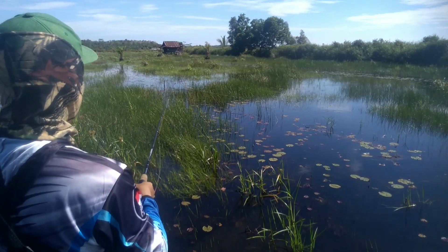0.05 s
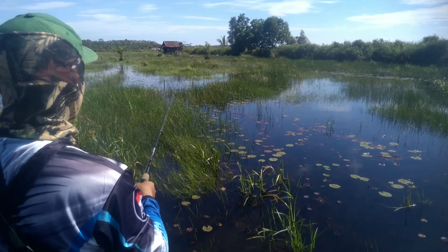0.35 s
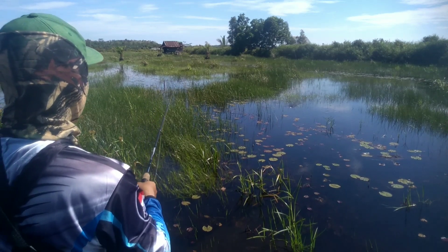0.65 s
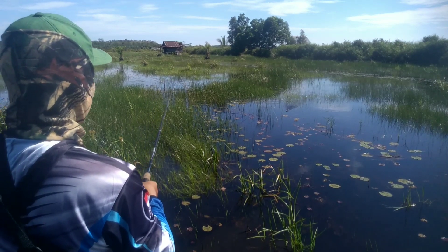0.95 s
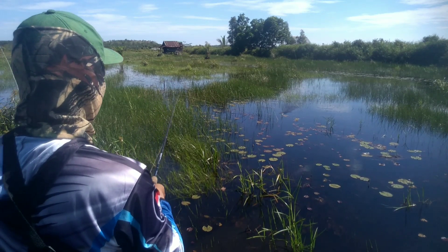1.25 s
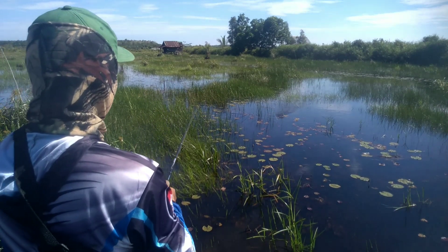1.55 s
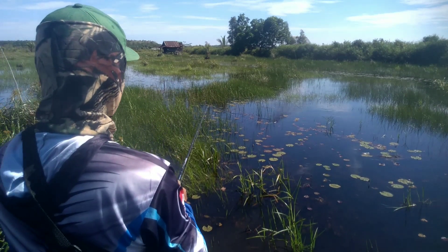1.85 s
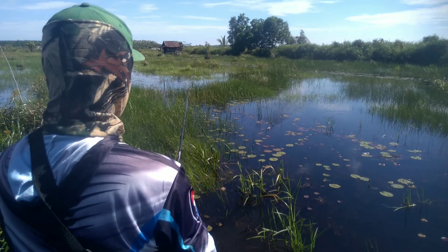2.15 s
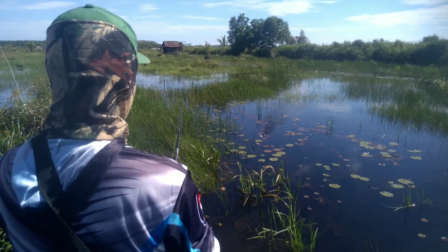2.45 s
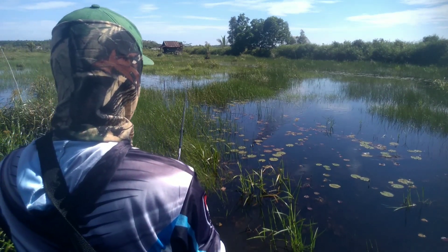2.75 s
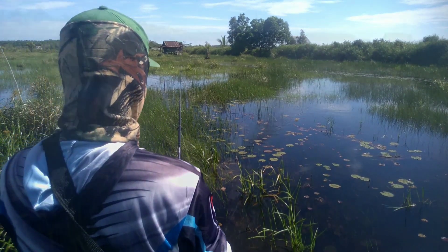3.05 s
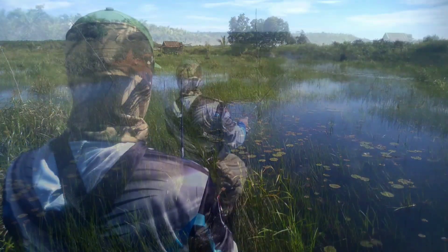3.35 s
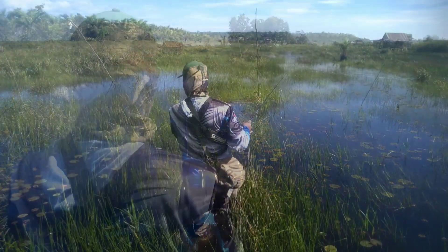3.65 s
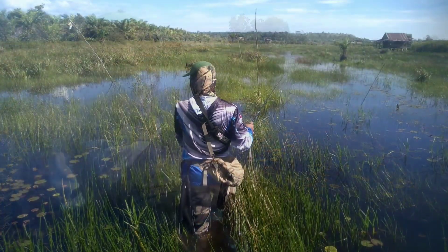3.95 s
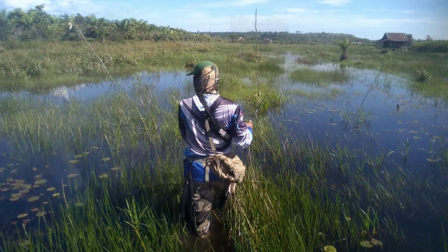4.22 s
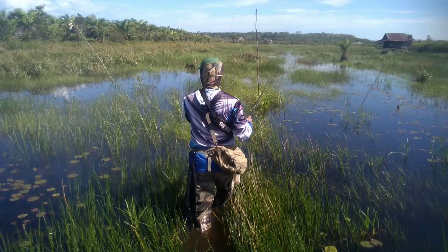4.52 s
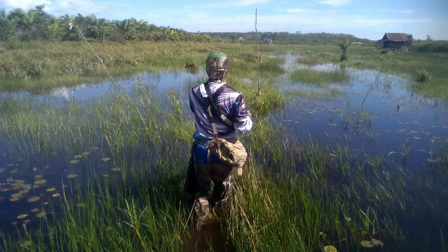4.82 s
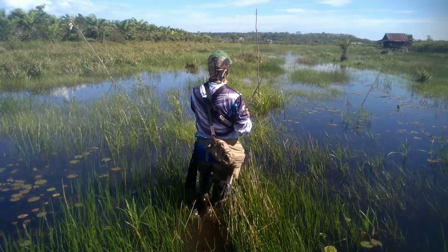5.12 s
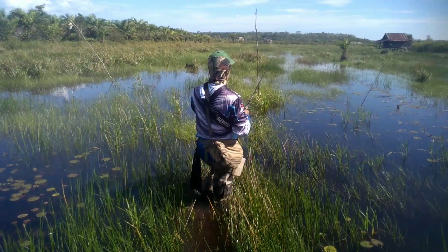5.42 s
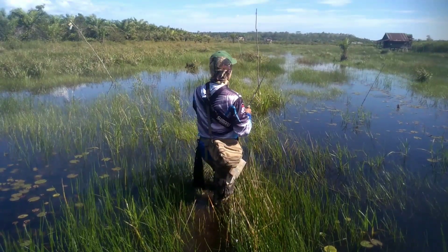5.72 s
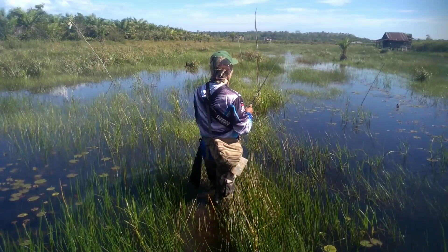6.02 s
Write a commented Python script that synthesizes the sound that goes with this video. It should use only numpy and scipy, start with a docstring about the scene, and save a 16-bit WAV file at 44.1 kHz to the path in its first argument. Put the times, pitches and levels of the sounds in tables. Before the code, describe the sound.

Two slow wading strides slosh through shallow, grassy swamp water close to a small outdoor microphone, the second louder and splashier, each followed by muddy gurgles. Before them the marsh is quiet, with faint trilling insects, far birds, lone plops and a couple of dull gear bumps. Low wind buffets the microphone and grows near the end. The brighter sounds sit to the right.

```python
"""A grassy swamp: wind buffets a small camera's two ports over a faint hush, insects trill, far birds call.
Lone bubbles plop, grass brushes past and gear bumps softly. At about 3 s and 5 s someone wades a slow
stride, the second louder: each leg folds air into the water, which rings as gulps, bubbles and fizz,
and drags spray through the reeds. Mud gurgles under the boots, and the wind builds towards the end.
The left port is muffled, so the bright sounds of the marsh sit to the right."""
import sys
import numpy as np
from scipy import signal
from scipy.fft import rfft, irfft
from scipy.io import wavfile
from scipy.ndimage import uniform_filter1d

SR = 44100
rng = np.random.default_rng(int(sys.argv[2]) if len(sys.argv) > 2 else 0)


def bounce(signal):
    """Save signal as a 16-bit WAV file at the path given by the first command-line argument."""
    frames = np.transpose(np.atleast_2d(signal))
    limited = np.clip(frames, -1, 1)
    pcm = np.round(limited * 32767).astype(np.int16)
    wavfile.write(sys.argv[1], SR, pcm)


N = 272538
TIME, BINS = np.arange(N) / SR, np.fft.rfftfreq(N, 1 / SR)
TRILLER_HZ, CHIRPER_HZ = 9705, 7905  # the two main near insects


def gain_of(db):
    """Decibels to amplitude."""
    return 10 ** (np.asarray(db) / 20)


def unit_rms(x):
    """Scales to rms 1."""
    return x / np.sqrt(np.mean(x ** 2) + 1e-20)


def steadied(x, span_s):
    """Rides the level to about rms 1 over span_s, keeping the faster grain."""
    size = max(int(span_s * SR), 8)
    power = np.mean(np.atleast_2d(x) ** 2, axis=0)
    return x / np.sqrt(abs(uniform_filter1d(uniform_filter1d(power, size), size)) + 1e-20)


def on_bins(points):
    """Spreads (freq_hz, value) rows over the frequency bins."""
    hz, value = np.transpose(points)
    return np.interp(np.log(BINS + 1), np.log(hz + 1), value)


def coloured(x, points):
    """EQ from (freq_hz, gain_db) rows, falling steeply above the last."""
    octaves_above = np.log2(np.maximum(BINS / points[-1][0], 1))
    return irfft(rfft(x) * gain_of(on_bins(points) - 20 * octaves_above), N)


def fader(rows):
    """Gain over time from (time_s, level_db) rows."""
    return gain_of(np.interp(TIME, *np.transpose(rows)))


def held(start, length, rise_s, fall_s):
    """An envelope that rises, holds until start + length, and dies away."""
    attack = np.clip((TIME - start) / rise_s, 0, 1) ** 2
    return attack * np.exp(-np.maximum(TIME - start - length, 0) / fall_s)


def crest(s, rise_s, fall_s, hold_s=0):
    """An envelope that swells up to time s, holds, and dies away."""
    return np.exp(-np.maximum(s - TIME, 0) / rise_s - np.maximum(TIME - s - hold_s, 0) / fall_s)


def add(mix, s, sound):
    """Mixes a sound in at time s."""
    part = mix[max(round(s * SR), 0):][:len(sound)]
    part += sound[:len(part)]


def narrow(hz, width_hz):
    """Noise in one resonance; at 0 Hz, a random drift."""
    return unit_rms(irfft(rfft(rng.standard_normal(N)) / (1 + ((BINS - hz) / width_hz) ** 2), N))


def bubble(hz, t60, glide, swell_cycles):
    """A pocket of air rings, its pitch gliding up as it nears the surface."""
    t = np.arange(int(1.2 * t60 * SR) + 16) / SR
    shape = (1 - np.exp(-(t * hz / swell_cycles) ** 2)) * np.exp(-np.log(1000) * t / t60)
    return shape / shape.max() * np.sin(2 * np.pi * hz * t * (1 + glide * t / t60))


def cloud(low_hz, high_hz, per_s, cycles, spread_db, glide, count=40):
    """Bubbles of many sizes, each size ringing at its own random moments."""
    chance, strength, kind = rng.random(N), rng.exponential(1, N), rng.integers(0, count, N)
    rings = [bubble(hz, cycles * rng.uniform(0.26, 1.84) / hz, glide, swell_cycles=1.5)
             for hz in np.geomspace(low_hz, high_hz, count)]
    out = np.zeros(N)
    for at in np.flatnonzero(chance < per_s / SR):
        gain = gain_of(spread_db * min(strength[at], 4))
        add(out, at / SR, gain * rng.choice([-1, 1]) * rings[kind[at]])
    return out


def ports(x, lag_ms, wet_db, t60, likeness):
    """Stereo with diffuse echoes off water and reeds; the left port lags below its resonance."""
    t = np.arange(SR // 2) / SR
    tail = rng.standard_normal((2, len(t))) * np.exp(-np.log(1000) * t / t60) * (1 - np.exp(-t / 0.0036))
    tail /= np.linalg.norm(tail[0])
    echo, left_echo = gain_of(wet_db) * signal.fftconvolve(x[None], tail, axes=1)[:, :N]
    left = x + likeness * echo + np.sqrt(1 - likeness ** 2) * left_echo
    delay_ms = lag_ms / (1 + (BINS / 1900) ** 4)
    return np.array([irfft(rfft(left) * np.exp(-2j * np.pi * BINS * delay_ms / 1000), N), x + echo])


def wind():
    """Eddies press on each port; only the slowest are shared."""
    # strength of the breeze: time_s, level_db
    breeze = [(0.0, -54), (0.3, -62.5), (0.45, -53), (0.75, -67), (3.05, -66), (3.45, -53), (3.9, -47.5),
              (4.45, -48.5), (4.7, -61.5), (4.95, -46), (5.85, -40.5), (6.1, -36)]
    # EQ of the low buffeting and of the flutter above it: freq_hz, gain_db
    buffet_eq = [(10, -19.5), (40, -4), (97, 5), (145, -1), (185, -11), (280, -32.5)]
    flutter_eq = [(120, -3.5), (210, 7.5), (330, 1.5), (480, -23.5)]
    # how alike the two ports are: freq_hz, likeness (0-1)
    port_likeness = [(35, 0.95), (90, 0.32), (400, 0.051)]
    left, other = rng.standard_normal((2, N))
    likeness = on_bins(port_likeness)
    right = irfft(likeness * rfft(left) + np.sqrt(1 - likeness ** 2) * rfft(other), N)
    eddies = np.array([left, right])
    buffet = steadied(coloured(eddies, buffet_eq), 0.42)
    flutter_fade_in = fader([(2.5, -33), (3.37, -8.5)])  # the flutter fades in at about 3 s
    flutter = steadied(coloured(eddies, flutter_eq), 0.8) * flutter_fade_in
    lean_db = np.interp(TIME, [.4, 1.1, 2.6, 3.2], [0.0, 6.0, 5.0, -1.5])  # swings left, then back
    return (gain_of(1.44) * buffet + flutter) * fader(breeze) * gain_of([lean_db, -lean_db])


def air():
    """Faint even hush of the open marsh."""
    # EQ of the hush: freq_hz, gain_db
    hush_eq = [(100, 16.5), (600, 2.5), (3000, -6), (9800, -7.5), (15500, -16)]
    hush = unit_rms(coloured(rng.standard_normal((2, N)), hush_eq))
    return hush * fader([(3, -74.5), (6.18, -77.5)]) * gain_of([[-1.5], [1.5]])


def insects():
    """A far chorus, and near stridulators whose thin tones pulse with each wing stroke."""
    # bouts of the near insects: start_s, length_s, pitch_hz, pulse_depth (0-1), level_db
    trills = [(0.444, 0.56, CHIRPER_HZ, 0.5, -77.5), (0.957, 0.61, TRILLER_HZ, 0.36, -71.5),
              (1.714, 1.55, TRILLER_HZ, 0.1, -75.5), (2.446, 0.33, CHIRPER_HZ, 0.55, -74),
              (3.303, 0.65, TRILLER_HZ, 0.5, -81), (3.974, 0.56, 6520, 0.3, -92.5),
              (5.65, 1.23, CHIRPER_HZ, 0.5, -86)]
    # fade of the far chorus: time_s, level_db
    chorus_fade = [(3, -76), (4.0, -83.5)]
    strokes_per_s = 22 * (1 + 0.28 * narrow(0, 8))
    strokes = np.cumsum(strokes_per_s) / SR
    rasp = 1 + 0.6 * narrow(0, 240)
    pulse = unit_rms(np.exp(-(np.sin(np.pi * strokes) / 0.4) ** 2))
    wander_hz = 45.1 * narrow(0, 30)
    falter = gain_of(4 * narrow(0, 1.8))
    near = np.zeros(N)
    for start, length, hz, depth, db in trills:
        tone = unit_rms(np.sin(2 * np.pi * np.cumsum(hz + wander_hz) / SR) * (1 - depth + depth * pulse))
        near += gain_of(db) * tone * held(start, length, rise_s=0.076, fall_s=0.1)
    bursts = unit_rms(np.sqrt(pulse * np.maximum(narrow(0, 5.6), 0)))  # far ones chirp on and off
    far = narrow(7370, 290)
    far += bursts * (gain_of(-8.5) * narrow(7920, 60) + gain_of(-5) * narrow(8780, 110))
    return np.tile(near * falter * rasp + gain_of(-4) * far * fader(chorus_fade), (2, 1))


def birds_and_drips():
    """Distant bird notes, hoarse when loud, plus two short drip-like clicks, all blurred by echoes."""
    # bird notes, and the clicks at 1.864 s and 2.268 s: start_s, length_s, first_hz, last_hz, level_db
    glides = [(0.115, 0.043, 1970, 2130, -65), (0.162, 0.046, 2363, 2055, -66.5),
              (0.201, 0.051, 1920, 1763, -68), (0.26, 0.066, 2253, 1980, -66.5),
              (0.432, 0.08, 1735, 1834, -68), (0.467, 0.24, 2057, 2088, -74),
              (0.809, 0.068, 2000, 1786, -68.5), (0.872, 0.034, 2133, 2275, -66),
              (1.08, 0.416, 2182, 2238, -76), (1.119, 0.066, 1737, 1815, -71.5),
              (1.199, 0.087, 2096, 2188, -72), (1.326, 0.036, 1927, 1616, -66.5),
              (1.483, 0.03, 6050, 5560, -72), (1.556, 0.083, 1680, 2272, -72.5),
              (1.732, 0.036, 2230, 2050, -73), (1.864, 0.018, 2414, 2170, -64),
              (2.136, 0.038, 2066, 2174, -71.5), (1.968, 0.11, 4180, 4330, -68),
              (2.107, 0.02, 4600, 5170, -64), (2.268, 0.014, 1740, 2770, -63),
              (2.345, 0.037, 2180, 2290, -64.5), (2.417, 0.037, 6560, 5650, -66.5),
              (2.452, 0.057, 2680, 1970, -65), (2.516, 0.13, 1752, 1774, -71.5),
              (2.67, 0.176, 2134, 2220, -68), (2.924, 0.135, 2242, 2135, -73),
              (4.29, 0.15, 2790, 2900, -91), (4.34, 0.11, 2370, 2415, -87.5)]
    hoarse_db = -68  # tones this loud waver and rasp fully
    waver_hz, rasp = 85 * narrow(0, 50), 0.45 * narrow(0, 130)
    out = np.zeros(N)
    for s, length, first_hz, last_hz, db in glides:
        n, at = int(length * SR), int(s * SR)
        hoarse = min(gain_of(db - hoarse_db), 1)
        hz = np.linspace(first_hz, last_hz, n) + hoarse * waver_hz[at:][:n]
        tone = np.sin(2 * np.pi * np.cumsum(hz) / SR) * (1 + hoarse * rasp[at:][:n])
        add(out, s, gain_of(db) * unit_rms(tone * signal.windows.tukey(n, .3)))
    return ports(out, lag_ms=0.21, wet_db=-4, t60=0.5, likeness=0.83) * gain_of([[0], [-6]])


def plops():
    """Single big bubbles ring, and four lesser ones pinch off just after each."""
    # big bubbles: start_s, peak_db, pitch_hz, t60_s
    big_bubbles = [(.305, -64, 1214, 0.029), (.905, -54, 1495, 0.035), (1.155, -63, 833, 0.041),
                   (1.408, -55, 1126, 0.075), (2.564, -64.5, 1040, 0.043), (3.15, -49, 1310, 0.0095),
                   (3.217, -46.5, 576, 0.029), (3.295, -46, 457, 0.047), (3.309, -45.5, 852, 0.03),
                   (3.382, -53.5, 2400, 0.019), (3.493, -39, 850, 0.0096), (3.696, -50, 530, 0.029),
                   (3.722, -49.5, 2940, 0.0093), (4.093, -54, 1436, 0.037), (4.204, -48, 337, 0.052),
                   (5.091, -45, 1045, 0.054), (5.127, -31.5, 1165, 0.036), (5.3059, -22, 1178, 0.019),
                   (5.3248, -18.5, 1390, 0.01), (5.382, -39.5, 2420, 0.023), (5.385, -32, 783, 0.018),
                   (5.388, -34, 418, 0.031), (5.468, -35.5, 1100, 0.023), (5.469, -37.5, 3160, .028),
                   (5.591, -40, 1900, 0.011), (5.884, -41, 1182, 0.031), (6.022, -37.5, 522, 0.025),
                   (6.056, -30.5, 328, 0.028), (6.14, -44.5, 975, 0.056)]
    out = np.zeros(N)
    for s, db, hz, t60 in big_bubbles:
        add(out, s, gain_of(db) * bubble(hz, t60, glide=0.067, swell_cycles=0.11 * t60 * hz))
        for late, detune in rng.uniform(-0.9, 1, (4, 2)):
            lesser = bubble(hz * 1.39 ** detune, t60, glide=0.19, swell_cycles=0.62)
            add(out, s + 0.022 * abs(late), gain_of(db - 10.5) * lesser)
    return out


def grass_brushing():
    """Envelope of blades of grass brushing past."""
    # brushes: start_s, length_s, level_db
    brushes = [(0.878, 0.016, -70.5), (2.925, 0.13, -74)]
    return sum(gain_of(db) * held(s, length, rise_s=0.013, fall_s=0.014) for s, length, db in brushes)


def gear():
    """Dull bumps of tackle against the body."""
    # soft knocks: start_s, peak_db, pitch_hz, t60_s
    bumps = [(1.538, -51.5, 262, 0.08), (2.569, -50, 203, 0.07)]
    out = np.zeros(N)
    for s, db, hz, t60 in bumps:
        add(out, s, gain_of(db) * bubble(hz, t60, glide=0, swell_cycles=0.72))
    return out * gain_of([[-4], [1]])


def stirring():
    """Envelope of the wading: a leg pushes, lifts clear and drains, with waves breaking on top."""
    # strides: start_s, push_s, drain_s, level_db
    strides = [(3.138, 0.45, 0.6, -58), (5.047, 0.32, 0.56, -50)]
    # waves against the leg: peak_s, level_db
    sloshes = [(3.132, -62), (3.227, -54.5), (3.303, -56.5), (3.495, -53), (3.567, -51.5), (3.831, -56.5),
               (5.02, -60.5), (5.128, -50), (5.157, -43.5), (5.231, -45.5), (5.308, -41), (5.328, -39.5),
               (5.383, -42), (5.447, -41), (5.467, -39), (5.589, -74), (5.673, -63)]
    push_rise_s, power = 0.076, np.zeros(N)
    for start, push_s, drain_s, db in strides:
        push = np.clip((TIME - start) / push_rise_s, 0, 1) ** 2
        drained = np.maximum(TIME - start - push_s, 0) / drain_s
        drain_db = -24 * drained ** 3.23  # starts gently, then steepens
        power += (push * gain_of(db + drain_db)) ** 2
    for s, db in sloshes:
        power += (gain_of(db) * crest(s, rise_s=0.003, fall_s=0.023)) ** 2
    return np.sqrt(power)


def churn(stir):
    """Air folded in by the legs rings as big gulps, middling bubbles and fine fizz."""
    # EQ of each bubble size: freq_hz, gain_db
    gulp_eq = [(230, -31.5), (400, 0.5), (680, -0.5), (1000, -35)]
    bubble_eq = [(400, -31.5), (900, -2.5), (1200, 3.5), (1500, -4), (1900, -13)]
    fizz_eq = [(1200, -21), (1600, 10), (2700, -7), (3400, -18), (4500, -38.5)]
    gulps = cloud(305.8, 890, per_s=190, cycles=23.5, spread_db=3.35, glide=0.272)
    bubbles = cloud(603, 1680, per_s=300, cycles=40, spread_db=3.8, glide=0.17)
    fizz = cloud(1471, 3490, per_s=650, cycles=42, spread_db=5.0, glide=0.17)
    return stir * (gain_of(-4.5) * steadied(coloured(gulps, gulp_eq), 0.083)
                   + gain_of(-1.5) * steadied(coloured(bubbles, bubble_eq), 0.06)
                   + gain_of(-9) * steadied(coloured(fizz, fizz_eq), 0.08))


def spray(stir, surge):
    """Droplets and wet grass patter as the leg pushes through; soft showers fall as it lifts."""
    # EQ of the coarse and the fine drops: freq_hz, gain_db
    coarse_eq = [(1500, 17), (2400, -3), (3100, 3), (4400, 9.5), (5100, -1), (5750, -34.5), (6750, 9),
                 (7800, -14), (10000, -39)]
    fine_eq = [(6500, 1.5), (8700, -5.5), (10000, -1), (11900, -14), (14300, -0.5), (15500, -8)]
    # showers thrown up by the leg: peak_s, level_db, pitch_hz
    showers = [(3.29, -71.5, 12300), (3.47, -65.5, 7300), (3.585, -60, 7400), (5.17, -65.5, 6700),
               (5.389, -61.5, 14100), (5.456, -50.5, 6630), (5.505, -60.5, 9800)]
    coarse = cloud(1860, 8020, per_s=3400, cycles=42, spread_db=5.1, glide=0.1)
    coarse = steadied(coloured(coarse, coarse_eq), 0.05)
    fine = cloud(6000, 15500, per_s=3200, cycles=36, spread_db=4.0, glide=0.05)
    fine = steadied(coloured(fine, fine_eq), 0.05)
    breaking_db, mist_db, growth = -48.5, -29.5, 1.21  # spray grows faster than the stirring
    splashing = gain_of(breaking_db - 6.5) * (stir / gain_of(breaking_db)) ** growth
    patter = surge * coarse * (splashing + grass_brushing()) + fine * gain_of(mist_db) * stir
    for s, db, hz in showers:
        alike = signal.lfilter(*signal.iirpeak(hz, Q=14, fs=SR), fine)  # like drops stress one pitch
        drops = unit_rms(fine + gain_of(10.5) * alike)
        patter += gain_of(db) * drops * crest(s, rise_s=0.019, fall_s=0.039, hold_s=0.0048)
    return patter


def slaps():
    """Water slaps and blades of grass snap: tiny bursts of bright noise."""
    # cracks: start_s, level_db
    cracks = [(3.579, -47.5), (5.388, -43), (5.461, -36)]
    band = signal.butter(2, [2200, 7000], "band", fs=SR, output="sos")
    decay = np.exp(-TIME[:SR // 20] / 0.0009)
    out = np.zeros(N)
    for s, db in cracks:
        noise = unit_rms(signal.sosfilt(band, rng.standard_normal(len(decay))))
        add(out, s, gain_of(db) * noise * decay)
    return out


def mud():
    """A boot squeezes air from the mud: deep gulps and round bubbles under an unbroken surface."""
    # gurgles: start_s, length_s, gulps_db, bubbles_db
    gurgles = [(3.842, 0.081, -51, -64), (4.812, 0.071, -88, -59.5), (4.963, 0.084, -67, -64.5),
               (5.657, 0.11, -47.5, -65), (5.988, 0.29, -45.5, -56)]
    gulps = steadied(cloud(207, 439, per_s=130, cycles=17.7, spread_db=6.9, glide=0.29), 0.026)
    bubbles = steadied(cloud(520, 1300, per_s=380, cycles=28, spread_db=3.4, glide=0.15), 0.05)
    gulp_gain, bubble_gain = np.zeros((2, N))
    for start, length, gulps_db, bubbles_db in gurgles:
        squeeze = held(start, length, rise_s=0.042, fall_s=0.033)
        gulp_gain = np.hypot(gulp_gain, gain_of(gulps_db) * squeeze)
        bubble_gain = np.hypot(bubble_gain, gain_of(bubbles_db) * squeeze)
    return gulps * gulp_gain + bubbles * bubble_gain


def scene():
    """The marsh and the wading, dulled at the left port, with wind and hush laid on top."""
    surge = gain_of(0.62 * narrow(0, 32))  # water breaks in clumps, moving bubbles and spray together
    stir = stirring()
    water = (churn(stir) + mud()) * surge + plops()
    water = ports(water, lag_ms=0.19, wet_db=-8.5, t60=0.38, likeness=0.58)
    splashes = ports(spray(stir, surge) + slaps(), lag_ms=0, wet_db=-12, t60=0.13, likeness=0)
    left, right = water + splashes + birds_and_drips() + insects() + gear()
    # the muffled port: freq_hz, gain_db
    muffle_eq = [(500, -2.5), (1400, 2.5), (2300, 3.5), (2900, -9.0), (3700, -34.5), (15000, -23)]
    return np.array([coloured(left, muffle_eq), right]) + wind() + air()


def record(dry):
    """A steep low-pass takes off the very top of the treble."""
    cutoff_hz = 15550
    lowpass = signal.firwin(511, cutoff_hz, window=("kaiser", 9), fs=SR)
    return signal.oaconvolve(dry, lowpass[None], "same")


dry = scene()
out = record(dry)
bounce(out)
```